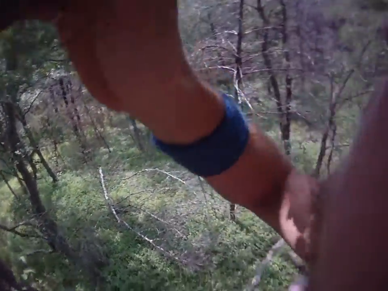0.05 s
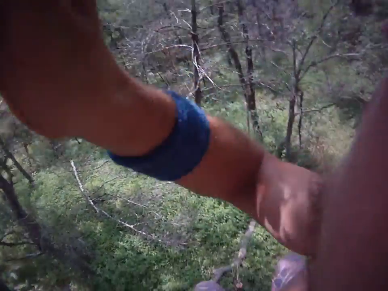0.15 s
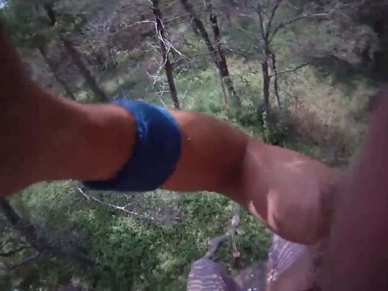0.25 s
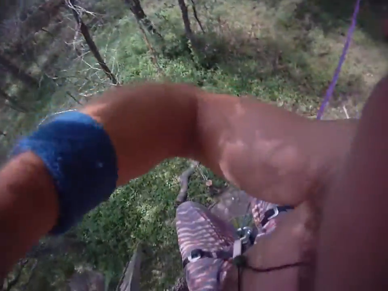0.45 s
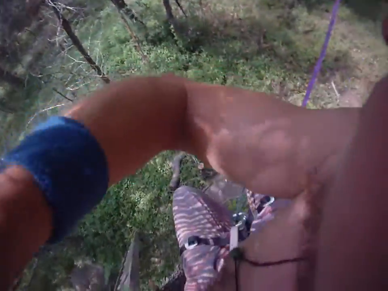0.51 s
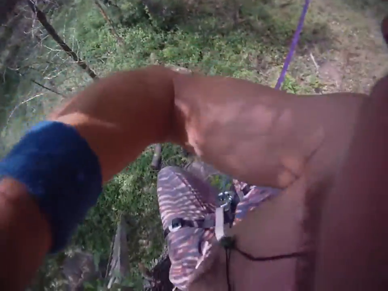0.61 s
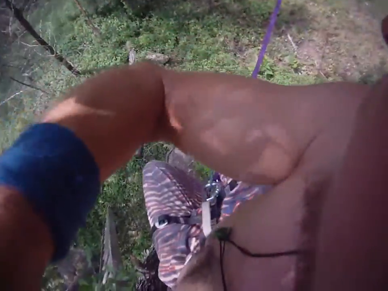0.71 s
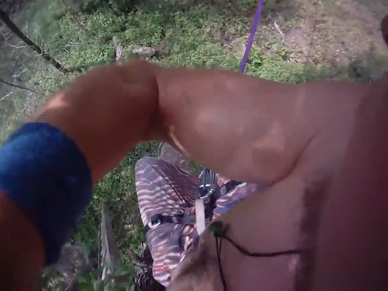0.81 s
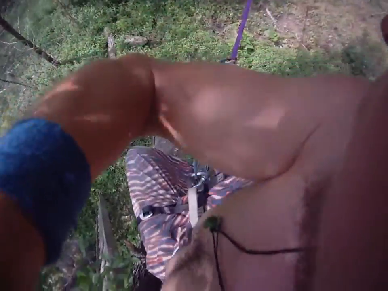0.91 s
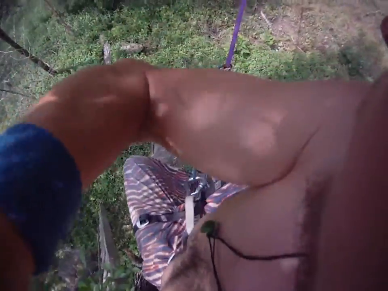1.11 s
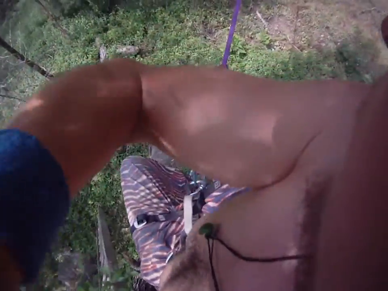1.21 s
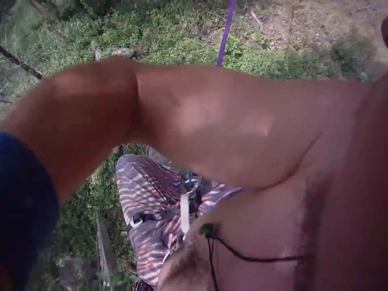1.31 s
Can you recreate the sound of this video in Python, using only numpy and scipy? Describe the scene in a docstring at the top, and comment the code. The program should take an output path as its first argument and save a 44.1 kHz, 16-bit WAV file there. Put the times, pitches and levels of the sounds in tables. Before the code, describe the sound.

Metal climbing gear scrapes right by a body-worn microphone, building to a couple of knocks at about 0.2 seconds. A second scrape starts with knocks around 0.3 seconds, squeaks briefly and ends in a sharp snap at 0.4, with little ringing. Light ticks and soft cloth rubbing follow, then a small hollow clack near 1.1 seconds and faint rattles, over a low, steady woodland hush.

```python
"""Metal gear handled in the woods

Close against a body-worn camera's microphone, metal gear scrapes twice, knocks and snaps home.
Each knock and scrape rings the same small, well-damped case; the steel itself sings only faintly.
Then come light ticks, a small hollow clack, faint rattles and soft rubbing over quiet woodland air."""
import sys
import numpy as np
from scipy import signal
from scipy.fft import rfft, irfft, next_fast_len
from scipy.io import wavfile
from scipy.ndimage import map_coordinates

SR = 44100
rng = np.random.default_rng(int(sys.argv[2]) if len(sys.argv) > 2 else 0)


def unload_wav(signal):
    """Save mono or channel-first audio to the path in sys.argv[1] as 16-bit WAV at rate SR, clipped to [-1, 1]."""
    wavfile.write(
        sys.argv[1],
        SR,
        np.round(np.clip(np.atleast_2d(signal).T, -1, 1) * 32767).astype(np.int16),
    )


N = 59535

# resonances of the case (frequency [Hz], width [Hz], level [dB])
CASE_MODES = [(553, 190, -13), (790, 57, -8), (1204, 350, -14), (1640, 82.7, 4.5), (2120, 580, -4),
              (2734, 260, 0), (3226, 210, -1.5), (4285, 300, -5), (5960, 780, -10.5), (7168, 880, -10),
              (9050, 580, -18), (14900, 1200, -34)]
# blows on the case (time [s], strength [dB], bass [dB], ring [dB], bite [dB], treble [dB],
# thud [dB], crunch [dB])
BLOWS = [(0.0661, -39.5, 9.5, -1, 5.5, -6, -22.5, -1), (0.165, -35, 10, 2, 5.5, -1.5, -31, -1),
         (0.1889, -14, -1, 1, -4.5, -20, -41, -8.5), (0.2338, -11, 0, 1, -2.5, -9.5, -29.5, -3),
         (0.2397, -9.5, -2.5, 0.5, -6.5, -0.5, -33, -3), (.3177, -31, 16.5, -3, -0.5, -7.5, -3.5, -8),
         (0.333, -28.5, -16, -0.5, 0.5, -11, -15.5, -1), (0.3365, -8.5, 4, -0.5, 1.5, -6, -19, -4),
         (0.3401, -12, 3.5, -0.5, -0.5, -13.5, -25.5, -5.5), (0.3592, -13, 4.5, -3, 1, -5.5, -42.5, -2),
         (0.3935, -15.5, 0, -1, -9.5, -9, -10, -8.5), (0.3946, -4, -1, 3.5, 8.5, 10, -17, -5)]
# pressure of the long scrape and of the slide into the snap (time [s], level [dB])
SCRAPE_PRESSURE = [(.13, -81.5), (.148, -47.5), (.163, -51.5), (.172, -38), (.186, -41), (.207, -32.5),
                   (.218, -38), (.23, -29), (.235, -21), (.247, -30), (.256, -59.5), (.266, -87.5)]
SLIDE_PRESSURE = [(.325, -80), (.342, -26), (.356, -44.5), (.364, -32.5), (.373, -40), (.386, -35),
                  (.393, -20), (.402, -43), (.425, -62.5), (.46, -78.5)]
# grit of each stroke, and the hiss that goes straight to the microphone (frequency [Hz], level [dB])
SCRAPE_GRIT = [(100, -10), (400, -4.5), (900, -1), (1600, -3), (2700, 0.5), (4000, -4), (5200, 3),
               (6500, 0.5), (9500, 2.5), (14000, 0)]
SLIDE_GRIT = [(100, 3.5), (500, 2.5), (900, 3.5), (1600, -4), (3000, 3.5), (4300, -1), (6500, -4),
              (9500, 3), (14000, 1)]
DIRECT_HISS = [(100, -47.5), (400, -29), (1100, -21), (2000, -7.5), (5000, -14), (8200, -25), (10500, -16),
               (11500, -30), (15000, -32.5)]
# stick-slip squeak during the slide (time [s], pitch [Hz], level [dB])
SQUEAK_PATH = [(.358, 3196, -71.5), (.366, 3170, -39), (.384, 3300, -37.5), (.3905, 3163, -22),
               (.395, 3400, -40), (.399, 3160, -82.5)]
# stick-slip creaks (time [s], half length [s], pitch [Hz], glide [share of pitch per s], level [dB])
CREAK_TONES = [(.19, .007, 790, 1, -46), (.237, 0.0034, 9140, -11, -26), (.238, 0.0054, 2665, 0, -25.5),
               (.242, .007, 1640, -0.5, -28.5), (0.363, 0.0071, 781, 10.5, -33),
               (1.338, .009, 2670, 3, -69.5)]
# tiny hard ticks (time [s], level [dB], centre [Hz])
TICK_CONTACTS = [(0.325, -30, 6564), (0.4349, -33, 5550), (0.5243, -29, 6000), (0.8534, -24.5, 12000),
                 (1.045, -36, 9800), (1.0573, -36, 7700)]
# resonances of a small hollow part (frequency [Hz], width [Hz], level [dB])
HOLLOW_MODES = [(694, 74, 3.5), (990, 295, -4.5), (1400, 120, -1), (1625, 77, 0.5), (2650, 340, 0),
                (3300, 180, -1), (3930, 240, -4.5), (4320, 110, -6.5), (6150, 650, -6)]
# jiggles of loose gear (time [s], half length [s], level [dB])
RATTLE_SWELLS = [(1.12, 0.0023, -55.5), (1.143, 0.012, -63.5), (1.22, .004, -64), (1.234, .003, -57)]
# rubs of cloth and strap (time [s], half length [s], level [dB], treble [dB])
RUB_SWELLS = [(0.096, 0.029, -65, 6.5), (0.286, 0.0063, -52, 2.5), (0.318, 0.03, -49.5, -11),
              (0.413, 0.039, -70.5, 19.5), (0.53, 0.025, -69, 5), (0.596, 0.14, -66, 3),
              (0.752, 0.025, -57.5, -7), (0.816, 0.025, -60, -4), (.993, 0.0084, -63, 4),
              (1.049, 0.025, -61, -0.5), (1.279, 0.022, -56, -6.5)]
# colour of the cloth, the woodland air and the echo off the trees (frequency [Hz], level [dB])
CLOTH_COLOUR = [(100, -17.5), (500, -4), (900, 2.5), (1300, -1.5), (2300, 0), (5000, -13.5), (15000, -14)]
AIR_COLOUR = [(25, -9.5), (90, -1.5), (200, -3), (480, 1.5), (780, -2.5), (1100, -9), (2200, -10.5),
              (4000, -19.5), (10000, -16.5), (15000, -19.5)]
ECHO_COLOUR = [(100, -22.5), (350, -9.5), (1000, -26), (2000, -49), (12000, -35.5)]
# decay of that echo (frequency [Hz], time to fall by 60 dB [s])
ECHO_DECAY = [(100, 0.26), (600, 1), (2000, 0.13), (12000, 1)]


def knocks(strength_db=23.5, crunch_s=0.0012, thud_hz=467):
    """Right at the microphone, each blow crushes a little grit, rings the case and gives a dull thud."""
    out, t = np.zeros(N), np.arange(4096) / SR
    for s, db, *tone_db, thud_db, crunch_db in BLOWS:
        crunch = rng.standard_normal(len(t)) * np.exp(-t / crunch_s)
        push = (t == 0) + amp(crunch_db) * crunch / np.linalg.norm(crunch)
        ring = filtered(push, lambda f: case(f, *tone_db))
        thud = filtered(push, lambda f: amp(thud_db) / (1 + 1j * f / thud_hz) ** 2)
        add(out, s, amp(db + strength_db) * (ring - thud))
    return out


def case(f, bass_db=0, ring_db=0, bite_db=0, treble_db=0):
    """The case's response; the place and hardness of a contact favour its low, middle or high modes."""
    favour = [(800, bass_db), (1450, ring_db), (1800, ring_db), (2200, 0), (2800, 0),
              (3250, bite_db), (4300, bite_db), (6200, treble_db), (9500, treble_db), (13000, 0)]
    return sum((-1) ** k * amp(db + along(favour, hz)) * resonance(f, hz, width)
               for k, (hz, width, db) in enumerate(CASE_MODES))


def scrape(pressure, colour, slips_per_s=1000, spread_db=6, smooth_share=0.93):
    """Dense irregular slips under the stroke's pressure drive the case and hiss through the air."""
    level_db, = curves(pressure)
    slips = (rng.random(N) < slips_per_s / SR) * amp(spread_db * rng.standard_normal(N))
    slips *= rng.choice([-1, 1], N)
    grit = coloured(unit(slips) + smooth_share * rng.standard_normal(N), colour)
    hiss = coloured(np.std(grit) * rng.standard_normal(N), DIRECT_HISS)
    stroke = filtered(grit * amp(level_db), case) + hiss * amp(level_db)
    return stroke / np.std(filtered(grit, case) + hiss)


def squeak(jitter=0.079, partials_db=(-2, 1.5, -11), flicker_db=4.8):
    """The sliding metal sticks and slips at an unsteady high pitch."""
    t = np.arange(N) / SR
    hz, level_db = curves(SQUEAK_PATH)
    phase = 2 * np.pi * np.cumsum(hz * (1 + jitter * wobble(2500))) / SR
    tone = sum(amp(db) * np.sin((k + 1) * phase) for k, db in enumerate(partials_db))
    sliding = (t > SQUEAK_PATH[0][0]) & (t < SQUEAK_PATH[-1][0])
    return unit(tone * amp(flicker_db * wobble(900))) * amp(level_db) * sliding


def creaks(jitter=0.017):
    """Now and then a contact grips and gives a short, rough tone."""
    out, t = np.zeros(N), np.arange(N) / SR
    for s, half, hz, glide, db in CREAK_TONES:
        pitch = hz * (1 + glide * np.clip(t - s, -half, half) + jitter * wobble(1300))
        out += swell(s, half, db) * np.sqrt(2) * np.sin(2 * np.pi * np.cumsum(pitch) / SR)
    return out


def ticks(relative_width=0.8):
    """Small parts touch too lightly to ring the case."""
    out, tap = np.zeros(N), signal.unit_impulse(1024, 16)
    for s, db, hz in TICK_CONTACTS:
        burst = filtered(tap, lambda f: resonance(f, hz, relative_width * hz) ** 2)
        add(out, s, amp(db) * burst / np.linalg.norm(burst))
    return out


def steel(contacts, hz=4470, width_hz=30, db=-18):
    """The contacts set one narrow mode of the steel singing faintly."""
    return amp(db) * filtered(contacts, lambda f: resonance(f, hz, width_hz))


def clack(at_s=1.0716, gain_db=0.5, soft_hz=6000):
    """A small hollow part is struck once, softly enough to dull its top end."""
    out = np.zeros(N)
    modes = lambda f: sum(amp(db) * resonance(f, hz, width) for hz, width, db in HOLLOW_MODES)
    add(out, at_s, amp(gain_db) * filtered(signal.unit_impulse(4096), modes))
    return filtered(out, lambda f: 1 / np.sqrt(1 + (f / soft_hz) ** 8))


def rattles(contacts_per_s=1200):
    """Loose gear jiggles: small clusters of feeble contacts on the case."""
    jiggle = sum(swell(s, half, db) for s, half, db in RATTLE_SWELLS)
    contacts = (rng.random(N) < contacts_per_s / SR) * rng.choice([-1, 1], N)
    return filtered(contacts * jiggle, case) / np.std(filtered(contacts, case))


def rubs(grain_db=2, treble_hz=4000):
    """Cloth and strap shift beside the microphone in soft, grainy swells."""
    cloth = noise(CLOTH_COLOUR) * amp(grain_db * wobble(390))
    treble = filtered(cloth, lambda f: f * f / (f * f + treble_hz ** 2))
    return sum(swell(s, half, db) * (cloth + (amp(treble_db) - 1) * treble)
               for s, half, db, treble_db in RUB_SWELLS)


def tree_echo(gear):
    """From farther off, the trees scatter a faint tail back to the microphone."""
    hz, t, bands = signal.stft(rng.standard_normal(SR), SR, nperseg=256)
    decay = amp(-60 * t / along(ECHO_DECAY, hz)[:, None])
    _, tail = signal.istft(bands * decay, SR, nperseg=256)
    tail = coloured(tail / np.linalg.norm(tail), ECHO_COLOUR)
    return signal.fftconvolve(gear, tail)[:N]


def woodland_air(level_db=-67.5):
    """A low, steady hush lies all around."""
    return noise(AIR_COLOUR) * amp(level_db)


def scene():
    """Gear and cloth up close, trees and quiet air behind, in mono."""
    gear = knocks() + scrape(SCRAPE_PRESSURE, SCRAPE_GRIT) + scrape(SLIDE_PRESSURE, SLIDE_GRIT)
    gear += squeak() + creaks() + ticks()
    gear += steel(gear) + clack() + rattles()
    return (woodland_air() + gear + tree_echo(gear) + rubs())[None]


def record(dry, top_hz=15400):
    """The body-worn camera rounds off the loudest peak and cuts steeply above its band limit."""
    rounded = dry[0] / (1 + np.abs(dry[0]) ** 6) ** (1 / 6)
    return filtered(rounded, lambda f: 1 / (1 + (f / top_hz) ** 100))[None]


def amp(db):
    """Decibels to gain."""
    return 10 ** (np.asarray(db) / 20)


def unit(x):
    """Scale to rms 1."""
    return x / np.sqrt(np.mean(x ** 2) + 1e-20)


def along(points, hz):
    """Interpolate (frequency [Hz], value) points on a log axis."""
    f, v = np.transpose(points)
    return np.interp(np.log(hz + 1), np.log(f + 1), v)


def curves(rows):
    """One value per sample for each column after the time."""
    s, *cols = np.transpose(rows)
    return [np.interp(np.arange(N) / SR, s, c) for c in cols]


def swell(s, half, db):
    """A bell-shaped rise and fall in gain, peaking at time s."""
    return amp(db) * np.exp(-((np.arange(N) / SR - s) / half) ** 2)


def filtered(x, response):
    """Pass x through a complex frequency response."""
    m = next_fast_len(len(x) + 4096)
    return irfft(rfft(x, m) * response(np.fft.rfftfreq(m, 1 / SR)), m)[:len(x)]


def coloured(x, colour):
    """Equalise x by (frequency [Hz], level [dB]) points."""
    return filtered(x, lambda f: amp(along(colour, f)))


def resonance(f, hz, width):
    """A causal resonance with peak gain 1."""
    return 1j * f * width / (hz * hz - f * f + 1j * f * width)


def wobble(rate):
    """A smooth random curve, rate knots a second."""
    return map_coordinates(rng.standard_normal(int(N * rate / SR) + 4), [np.arange(N) * rate / SR])


def noise(colour):
    """Coloured noise of rms 1."""
    return unit(coloured(rng.standard_normal(N), colour))


def add(track, s, sound):
    """Mix a sound in at time s."""
    part = track[round(s * SR):][:len(sound)]
    part += sound[:len(part)]


dry = scene()
out = record(dry)
unload_wav(out)
```